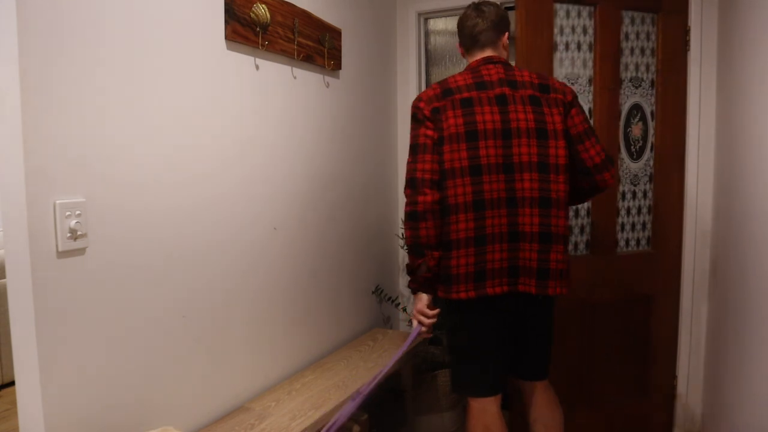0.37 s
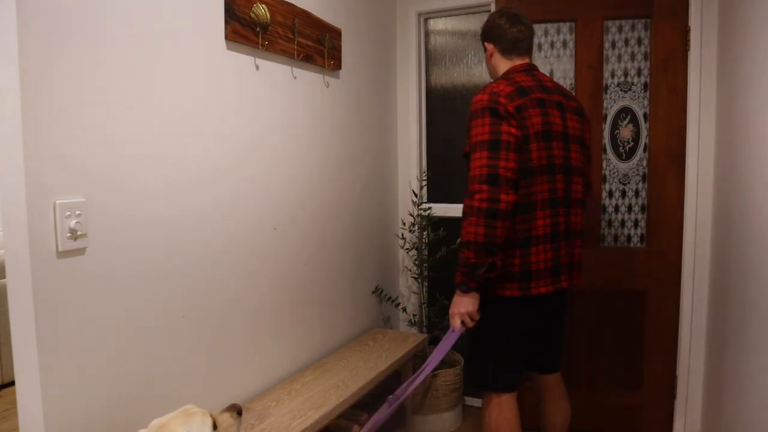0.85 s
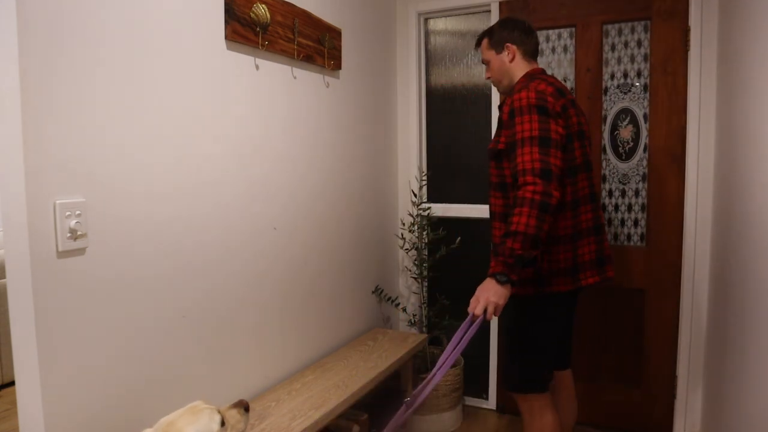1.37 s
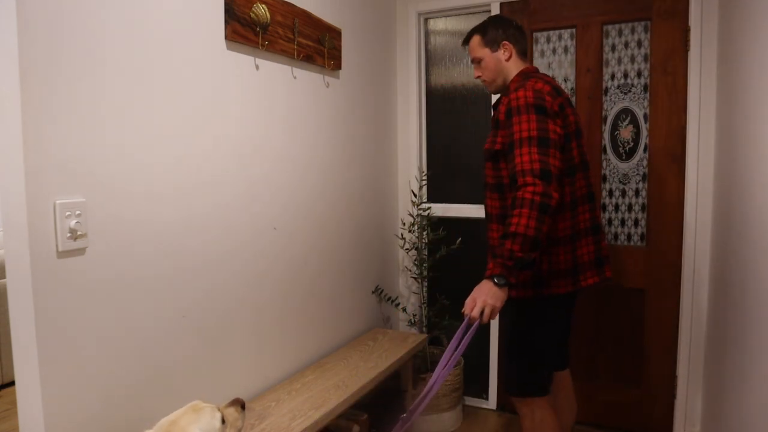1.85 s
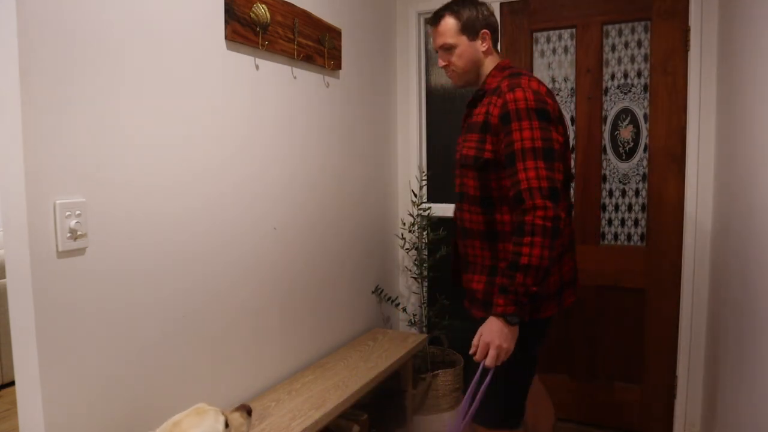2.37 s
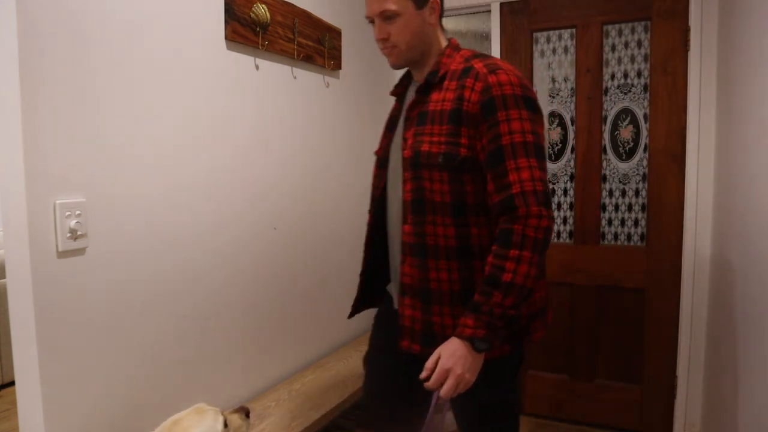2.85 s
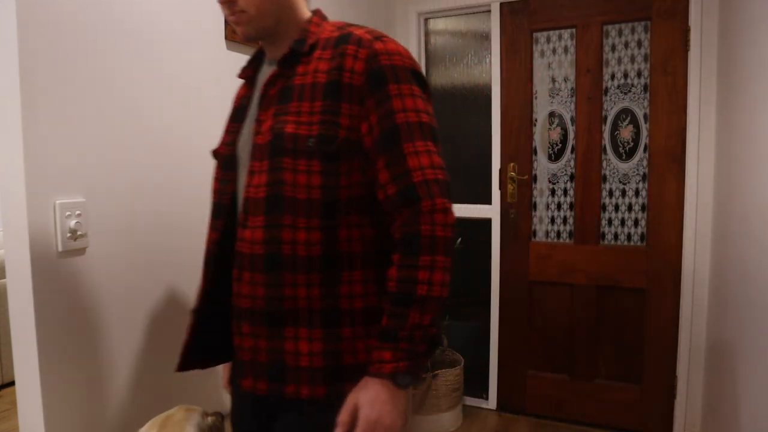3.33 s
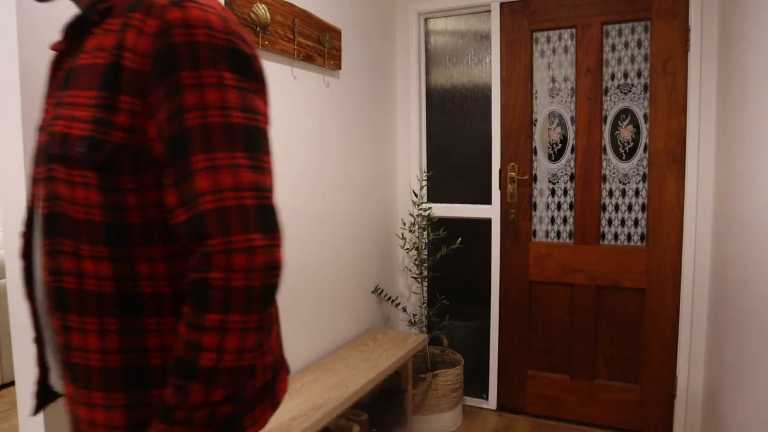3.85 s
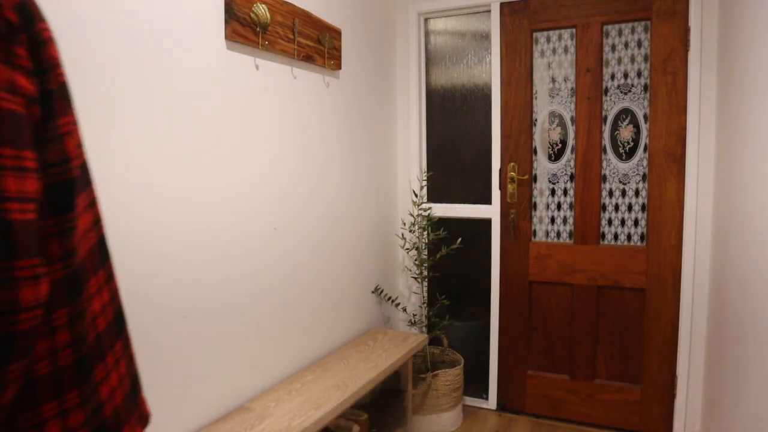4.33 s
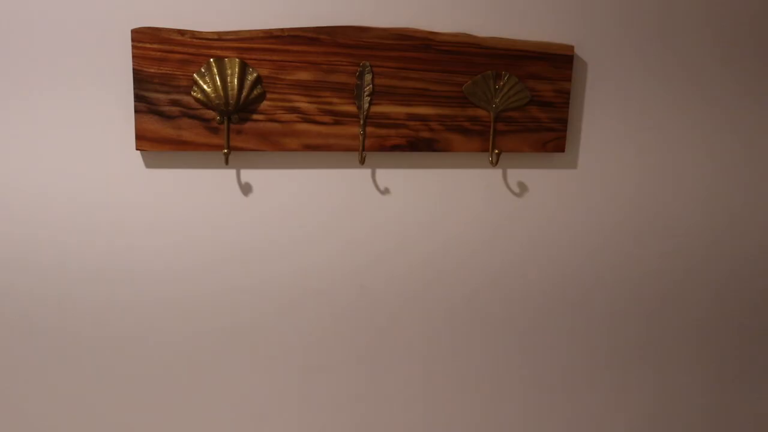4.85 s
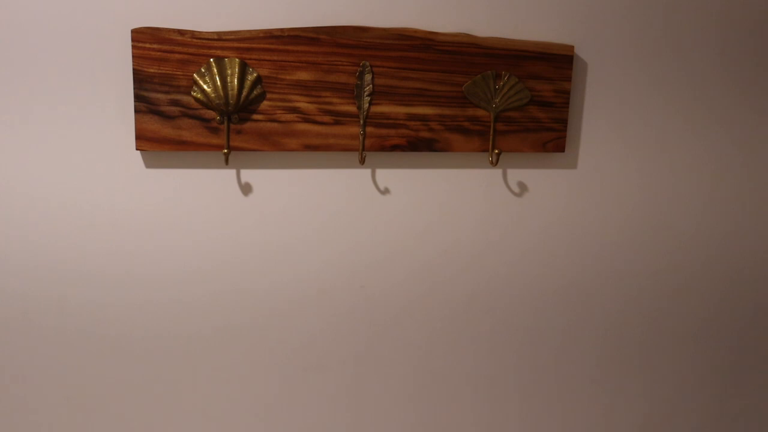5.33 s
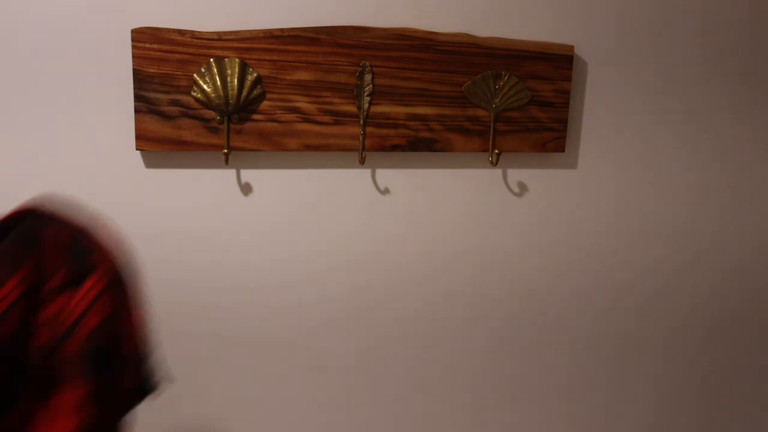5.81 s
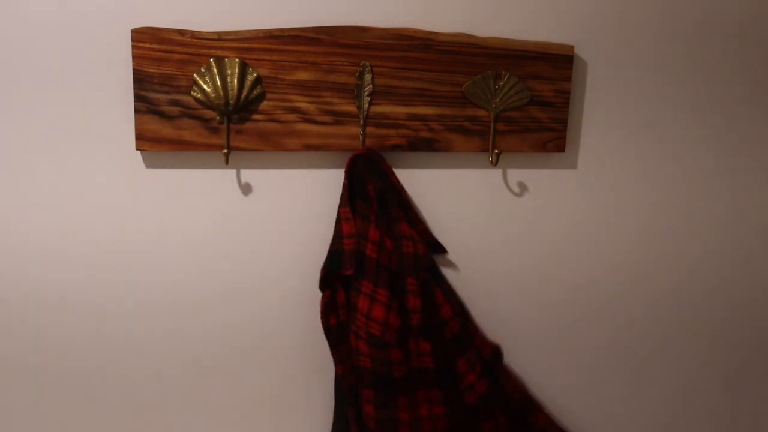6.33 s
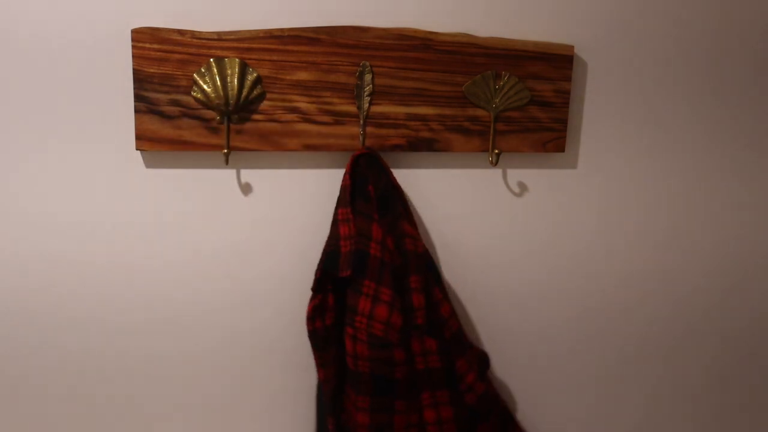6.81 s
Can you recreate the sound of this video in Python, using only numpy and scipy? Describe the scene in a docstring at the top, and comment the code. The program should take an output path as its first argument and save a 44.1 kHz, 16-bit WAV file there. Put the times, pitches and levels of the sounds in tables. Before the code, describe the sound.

In a small hard-walled hallway, clothes rustle while a dog's claws, lead and tags lightly tick and jingle. A latch clicks and a wooden door with glass panes bangs shut, rattling briefly. Feet scuff past, with sharp ticks and a hollow clatter close by. After an abrupt cut to a quieter spot, a shirt swishes onto a wall hook with a small wooden knock. Fixed indoor microphone, faint room hush.

```python
"""Dog and door in a hallway

A dog's paws, lead and tags tick and jingle; a wooden door with glass panes latches, bangs shut and rattles; feet
scuff past. After a cut, something whistles faintly and a shirt is hung on a wall hook. Contacts are noise bursts,
metal and hollow things are dying modes, cloth is grainy noise, the whistle a fuzzy gliding sine. A hard-walled
hall answers every hit, over low rumble and a steady hush."""
import sys
import numpy as np
from scipy import signal
from scipy.fft import rfft, irfft
from scipy.io import wavfile
from scipy.ndimage import map_coordinates

SR = 44100
rng = np.random.default_rng(int(sys.argv[2]) if len(sys.argv) > 2 else 0)


def boost(x):
    """Linear amplitude factor 10**(x/20) for a level x in decibels (scalar or array-like)."""
    u = np.asarray(x, float) / 20
    return 10 ** u


def inscribe(sig):
    """Save sig as 16-bit PCM at rate SR to the path in sys.argv[1].

    A 1-D sig is mono; a 2-D sig holds one channel per row.
    Samples are clipped to [-1, 1] before scaling.
    """
    pcm = np.round(np.clip(np.atleast_2d(sig).T, -1, 1) * 32767)
    wavfile.write(sys.argv[1], SR, pcm.astype(np.int16))


N = 306054  # length in samples
CUT_S = 4.727  # the first scene gives way to the second

# Low body of contacts and rubbing, relative spectrum: pitch_hz [Hz], level_db [dB]
BODY_COLOUR = [(100, -62), (200, -11), (400, 1.5), (800, 3), (2000, -3), (3000, -15.5), (5000, -64.5)]
# Bright edge of contacts and finest fibres, relative spectrum: pitch_hz [Hz], level_db [dB]
EDGE_COLOUR = [(2500, -58.5), (4500, -1.5), (7500, -2), (12000, -9), (15500, -19.5), (17000, -56.5)]
# Deepest part of the house rumble, relative spectrum: pitch_hz [Hz], level_db [dB]
DEEP_COLOUR = [(15, -59), (28, -7), (65, -6), (95, -3.5), (150, -62.5)]
# Floorboards, relative spectrum: pitch_hz [Hz], level_db [dB]
BOARDS_COLOUR = [(60, -120), (100, -0.5), (220, -2), (400, -6), (600, -120)]


def unit(x):
    """Scales a sound to rms 1."""
    return x / np.sqrt(np.mean(x ** 2) + 1e-20)


def along(points, hz):
    """Reads (Hz, value) points on a log frequency axis."""
    f, v = np.transpose(points)
    return np.interp(np.log(hz + 1), np.log(f + 1), v)


def curves(rows, **ends):
    """One value per sample for each column after the time."""
    s, *cols = np.transpose(rows)
    return [np.interp(np.arange(N) / SR, s, c, **ends) for c in cols]


def wander(points, size):
    """A smooth random curve through evenly spaced random points."""
    return map_coordinates(rng.standard_normal(points), [np.linspace(0, points - 1, size)])


def noise(gain, size, spiky_db=0):
    """Noise of rms 1 coloured by gain(Hz); spiky noise is made of uneven grains of 32 samples."""
    grain_db = spiky_db * rng.standard_normal(size // 32 + 1).repeat(32)[:size]
    grains = rng.standard_normal(size) * boost(grain_db)
    return unit(irfft(rfft(grains) * gain(np.fft.rfftfreq(size, 1 / SR)), size))


def shape(points):
    """Gain against frequency from a (Hz, dB) table."""
    return lambda hz: boost(along(points, hz))


def hump(centre_hz, octaves):
    """A broad resonance, steeper on its high side."""
    def gain(hz):
        distance = np.log2((hz + 1) / centre_hz) / octaves
        high_side = 1 + (hz / centre_hz / 3.0) ** 4
        return 1 / (1 + distance ** 2) ** 1.4 / high_side
    return gain


def ring(hz, t60, attack, waver):
    """A dying tone, one second long; its phase drifts a little."""
    t = np.arange(SR) / SR
    drift = waver * np.cumsum(rng.standard_normal(SR)) / np.sqrt(SR)
    return np.sin(2 * np.pi * hz * t + drift) * boost(-60 * t / t60) * (1 - np.exp(-t / attack))


def burst(length, attack):
    """Envelope of a short contact, half a second long; it falls 60 dB in its length."""
    t = np.arange(SR // 2) / SR
    return boost(-60 * t / length) * (1 - np.exp(-t / attack))


def swell(rise, fall):
    """Envelope with a smooth rise and a rounded fall, one second long."""
    t = np.arange(SR) / SR
    up = np.sin(np.pi / 2 * np.minimum(t / rise, 1)) ** 2
    return up * boost(-60 * (np.maximum(t - rise, 0) / fall) ** 2)


def hall(x, wet_db):
    """Adds a fresh tail: near walls answer fast and loud, then each frequency dies at its own speed."""
    # Late decay of the hall: pitch_hz [Hz], t60_s [s]
    decay = [(60, 0.38), (250, 0.95), (1000, 0.89), (3000, 0.66), (6000, 0.61), (11000, 0.37), (16000, 0.7)]
    hz, t, z = signal.stft(rng.standard_normal(SR), SR, nperseg=256)
    late = boost(-60 * t / along(decay, hz)[:, None])
    fade = late * (1 + 1.08 * boost(-60 * t / 0.17))
    fade *= boost(-2.5 * np.log2(1 + hz / 3000))[:, None]  # walls and coats soak up treble
    tail = signal.istft(z * fade, SR, nperseg=256)[1]
    tail = np.pad(tail, (150, 0)) / np.linalg.norm(tail)  # silent for 150 samples first
    x = x[:np.flatnonzero(np.abs(x) > boost(-130))[-1] + 1]  # drop the inaudible end
    wet = signal.fftconvolve(x, tail)
    return boost(wet_db) * wet + np.pad(x, (0, len(wet) - len(x)))


def add(track, s, x):
    """Lays x on the track at time s; the cut ends what started before it."""
    start = round(s * SR)
    stop = round(CUT_S * SR) if s < CUT_S else N
    track[start:stop][:len(x)] += x[:stop - start]


def rubbing():
    """Clothes and fur move: fibres slip in fine grains all the while."""
    # Loudness of the movement, one table per scene: time_s [s], hiss_db [dB], body_db [dB]
    scenes = [
        [(0.0, -55.5, -51), (0.2, -58.5, -55.5), (0.45, -68, -51), (0.7, -72, -58), (1.0, -61.5, -70),
         (1.5, -75, -65), (2.2, -65.5, -57), (2.66, -66, -60.5), (2.9, -59, -61.5), (3.3, -63, -64.5),
         (4.1, -63.5, -59.5), (4.36, -54, -49), (4.5, -54, -57), (4.72, -54, -56)],
        [(4.73, -63, -60.5), (5.0, -69, -67.5), (5.18, -71.5, -71.5), (5.33, -84.5, -88.5), (5.58, -64.5, -73),
         (5.9, -74, -90), (6.1, -92, -83), (6.23, -55, -53), (6.45, -51, -58), (6.7, -70, -74),
         (6.94, -68, -75.5)],
    ]
    # Hiss of the fibres, relative spectrum: pitch_hz [Hz], level_db [dB]
    hiss_colour = [(1180, -39), (2000, -4.5), (2640, -3), (3090, -5.5), (5610, -5), (6290, -12.5),
                   (9000, -9.5), (11700, -76.5), (19800, -120)]
    hiss_db, body_db = np.max([curves(rows, left=-120, right=-120) for rows in scenes], axis=0)
    fibres = noise(shape(hiss_colour), N, spiky_db=2.0)
    finest = boost(-6) * noise(shape(EDGE_COLOUR), N, spiky_db=2.5)
    low = noise(shape(BODY_COLOUR), N, spiky_db=1.0)
    return boost(hiss_db) * (fibres + finest) + boost(body_db) * low


def rumble():
    """Draught and steps: deep and floorboard noise bands slowly change level."""
    # Loudness of the two bands: time_s [s], deep_db [dB], boards_db [dB]
    levels = [(0.0, -56, -68.5), (0.4, -61, -61.5), (0.6, -62, -56.5), (1.1, -69, -61.5), (1.45, -72, -74),
              (2.7, -60.5, -76), (3.0, -69, -64), (3.7, -72.5, -71), (4.0, -69, -67.5), (4.7, -65.5, -69),
              (4.75, -77, -72), (5.4, -80, -74), (5.66, -83.5, -67.5), (6.1, -77, -73), (6.94, -77, -70.5)]
    deep_db, boards_db = curves(levels)
    return boost(deep_db) * noise(shape(DEEP_COLOUR), N) + boost(boards_db) * noise(shape(BOARDS_COLOUR), N)


def hush():
    """The still house: steady noise, slightly louder before the cut."""
    # Still house, relative spectrum: pitch_hz [Hz], level_db [dB]
    quiet_colour = [(100, -43), (200, -14), (400, -2), (1000, -5.5), (3000, -9.5), (6000, -12.5),
                    (10000, -14.5), (15000, -17.5), (16500, -29)]
    level_db = np.where(np.arange(N) < CUT_S * SR, -69, -70)
    return boost(level_db) * noise(shape(quiet_colour), N)


def strokes():
    """Soles, cloth and paws: a grainy swish swells smoothly and dies away."""
    # Single strokes: start_s [s], level_db [dB], centre_hz [Hz], rise_s [s], fall_s [s to -60 dB]
    stroke_rows = [(0.016, -48.5, 7000, 0.0064, 0.034), (0.337, -56, 6500, 0.007, 0.035),
                   (0.636, -58, 4300, 0.015, 0.14), (1.044, -42.5, 1417, 0.0028, 0.063),
                   (1.258, -52, 4000, 0.027, 0.2), (1.786, -31.5, 3000, 0.0088, 0.017),
                   (2.226, -56, 4000, 0.019, 0.091), (2.37, -41.5, 4800, 0.11, 0.22),
                   (2.40, -45, 1450, 0.028, 0.27), (2.89, -51.5, 2000, 0.022, 0.16),
                   (2.93, -56, 6100, 0.03, 0.27), (3.35, -68.5, 1300, 0.21, 0.27),
                   (3.545, -61, 7000, 0.023, 0.87), (3.64, -52, 2280, 0.017, 0.23),
                   (4.048, -55, 3000, 0.011, 0.14), (4.287, -41, 4840, .01, 0.088),
                   (4.34, -37.5, 4000, 0.028, 0.13), (4.662, -48, 4930, 0.023, 0.14),
                   (4.97, -63, 5000, .03, 0.058), (5.36, -66.5, 920, 0.26, 0.7),
                   (5.702, -65.5, 3980, 0.048, 0.29), (6.14, -64.5, 4000, .013, 0.16),
                   (6.22, -53, 6000, 0.0071, 0.11), (6.42, -41, 3910, 0.022, 0.23),
                   (6.65, -56, 3490, 0.017, 0.091)]
    out = np.zeros(N)
    for s, db, centre_hz, rise, fall in stroke_rows:
        swish = noise(hump(centre_hz, octaves=1.2), SR, spiky_db=0.5)
        swish += boost(-9.5) * noise(shape(EDGE_COLOUR), SR, spiky_db=5.5)  # finest fibres
        swish *= boost(1.7 * wander(50, SR))  # folds flutter
        add(out, s, hall(boost(db) * swish * swell(rise, fall), wet_db=-8))
    return out


def jingles():
    """Small loose metal parts ring in high modes, thin and chattering as the pieces touch."""
    # Metal parts touching: start_s [s], part [name], level_db [dB]
    jingle_rows = [(0.019, "clip", -39), (.235, "clip", -52), (0.748, "tag", -47.5), (1.064, "tag", -43.5),
                   (1.81, "latch", -37.5), (4.062, "buckle", -52.5), (4.404, "ring", -41),
                   (4.44, "ring", -47), (5.535, "button", -65.5), (6.155, "hook", -51)]
    # Modes of each named part: pitch_hz [Hz], level_db [dB, relative], t60_s [s]
    metal = {"tag": [(10100, -13, 0.24), (11800, -2.5, 0.197), (15250, -13, .2)],
             "clip": [(10600, -12, 0.42), (11190, -6, 0.23), (12300, -1, 0.21)],
             "ring": [(9650, -1.5, 0.48), (11160, 2, 0.33), (14370, -23, 0.13)], "latch": [(5870, 0, 0.51),
             (7950, -11.5, .5)], "buckle": [(8974, -4, .23)], "hook": [(3680, -2, 0.12)],
             "button": [(9650, 2.5, 0.35)]}
    out = np.zeros(N)
    for s, part, db in jingle_rows:
        tone = np.zeros(SR)
        for hz, level, t60 in metal[part]:
            chatter = boost(2.6 * wander(100, SR))
            tone += boost(level) * chatter * ring(hz, t60, attack=0.003, waver=17.0)
        add(out, s, hall(boost(db) * tone, wet_db=-10))
    return out


def ticks():
    """Hard points of contact, claws, metal clips and the rattling door: snaps that fall 60 dB in under 5 ms."""
    # Snaps: start_s [s], level_db [dB, before the envelope], centre_hz [Hz]
    tick_rows = [(0.0587, -31, 3830), (0.165, -30.5, 5200), (0.3624, -27, 5600), (0.8475, -37.5, 2760),
                 (0.865, -33.5, 3310), (0.904, -39, 5170), (0.46, -34, 6000), (1.068, -29.5, 6010),
                 (1.331, -28, 1750), (2.432, -26, 1620), (1.532, -22.5, 7000), (1.8363, -20, 5940),
                 (1.8706, -22.5, 4560), (1.898, -20, 3040), (1.926, -23, 4500), (3.098, -36, 4170),
                 (3.1868, -29, 2620), (3.3157, -30, 1800), (4.193, -20, 6700), (4.1976, -21, 4700),
                 (4.264, -19.5, 4670), (4.276, -17.5, 5240), (4.2806, -30, 4700), (4.6554, -22, 5570),
                 (4.6604, -27, 4900), (5.036, -30, 6120), (6.2705, -13, 3930), (6.3919, -21, 4580),
                 (6.7032, -36, 3370)]
    out = np.zeros(N)
    for s, db, centre_hz in tick_rows:
        snap = noise(hump(centre_hz, octaves=0.75), SR // 2) * burst(0.0046, attack=0.00029)
        add(out, s, hall(boost(db) * snap, wet_db=-3.5))
    return out


def taps():
    """Claws, latch, lead, buttons: a bright, sharp-edged scrape together with a burst with a hump and low body."""
    # Taps: start_s [s], level_db [dB, before the envelope], body_db [dB under or over the hump],
    # centre_hz [Hz], length_s [s]
    tap_rows = [(0.06, -25, -9, 4400, 0.043), (0.153, -41.5, -17, 1150, 0.067),
                (0.3615, -29, -10, 4900, 0.1), (0.626, -49.5, 4, 1970, 0.17),
                (0.7485, -34.5, -13, 1340, 0.064), (0.865, -25, -5, 3110, 0.035),
                (0.8897, -29, -23, 1313, 0.042), (1.051, -26, -0.5, 1856, 0.069),
                (1.5294, -24, -1.5, 3230, 0.075), (1.548, -29, -1, 1382, 0.069),
                (3.181, -39.5, -4.5, 2530, 0.21), (3.304, -36, -3, 1290, 0.16),
                (4.1937, -16, -6.5, 5600, 0.013), (4.2025, -18, -9.5, 4960, 0.047),
                (4.2572, -27, -8, 4700, 0.07), (4.274, -19.5, -27, 4710, 0.031),
                (4.432, -30, -15, 5000, 0.16), (4.6568, -29, -10, 4930, 0.081),
                (4.852, -58, 6.5, 1290, 0.06), (5.024, -38.5, -4.5, 5340, 0.067),
                (6.192, -42.5, 5.5, 1800, 0.085), (6.2667, -20.5, -7, 3790, 0.082),
                (6.3893, -15.5, -13, 3800, 0.039), (6.47, -28, -11.5, 3360, 0.05),
                (6.692, -45, -32, 3470, 0.057)]
    out = np.zeros(N)
    for s, db, body_db, centre_hz, length in tap_rows:
        contact = noise(hump(centre_hz, octaves=1.165), SR // 2)
        contact += boost(body_db) * noise(shape(BODY_COLOUR), SR // 2)
        contact *= burst(length, attack=0.094 * length)  # long contacts start more softly
        bright_scrape = boost(-16.5) * noise(shape(EDGE_COLOUR), SR // 2, spiky_db=8.5)
        bright_scrape *= burst(0.9 * length, attack=0.000423)
        add(out, s, hall(boost(db) * (contact + bright_scrape), wet_db=-4.0))
    return out


def knocks():
    """Hollow things such as floor, bench and wall board start softly and ring in low modes."""
    # Knocks: start_s [s], thing [name], level_db [dB]
    knock_rows = [(.363, "crate", -40.5), (.39, "bench", -51), (.49, "bench", -45), (.631, "board", -30),
                  (1.056, "stile", -37), (1.54, "floor", -45), (2.215, "floor", -33.5),
                  (2.49, "pane", -47.5), (4.19, "floor", -46), (4.29, "wall", -39.5),
                  (4.343, "bowl", -37.5), (4.372, "bowl", -34.5), (4.4, "bowl", -43), (4.75, "crate", -55),
                  (4.846, "board", -41), (5.029, "board", -36), (6.29, "rack", -41.5), (6.392, "rack", -31)]
    # Modes of each named thing: pitch_hz [Hz], level_db [dB, relative], t60_s [s]
    hollow = {"bench": [(235, 1.5, 0.31)], "board": [(586, 2.5, 0.025)], "crate": [(738, 13, 0.039)],
              "wall": [(38, -3.5, 0.36)], "stile": [(306, -3, .22), (1144, 0, 0.24)],
              "floor": [(92, -4, 0.13), (146, 1.5, 0.13), (205, -3, 0.3)], "pane": [(229, 3.5, 0.7)],
              "bowl": [(537, -6, 0.11), (614, -2, .15), (702, -0.5, 0.16), (856, -4.5, 0.12),
              (1580, -2, 0.093), (1930, -2, 0.082)], "rack": [(150, -6.5, 0.17), (212.4, -1.5, 0.26),
              (337, -10.5, 0.2)]}
    out = np.zeros(N)
    for s, thing, db in knock_rows:
        tone = sum(boost(level) * ring(hz, t60, attack=0.0034, waver=1.2) for hz, level, t60 in hollow[thing])
        add(out, s, hall(boost(db) * tone, wet_db=-12.5))
    return out


def thuds():
    """The house shudders under door, feet and rack: low noise swells and dies."""
    # Shudders: start_s [s], deep_db [dB], boards_db [dB], rise_s [s], fall_s [s to -60 dB]
    thud_rows = [(1.535, -57, -45.5, 0.015, 0.53), (1.901, -43.5, -41, 0.18, 0.31),
                 (2.298, -60, -57, 0.094, 0.68), (3.93, -75, -62, 0.031, 0.094),
                 (4.269, -62, -77, .06, 0.41), (6.15, -60.5, -51.5, 0.094, 0.4),
                 (6.36, -66, -46.5, 0.036, 0.28)]
    out = np.zeros(N)
    for s, deep_db, boards_db, rise, fall in thud_rows:
        deep = boost(deep_db) * noise(shape(DEEP_COLOUR), SR)
        boards = boost(boards_db) * noise(shape(BOARDS_COLOUR), SR)
        add(out, s, swell(rise, fall) * (deep + boards))
    return out


def door():
    """Door meets frame, then bounces: each blow cracks and rings the leaf's modes at new strengths."""
    # Blows: start_s [s], level_db [dB, whole blow], boom_db [dB, leaf only], length_s [s, crack]
    blows = [(1.7902, -22.5, 0, .01), (1.796, -11, -17.5, 0.038), (1.8014, -9, 1, 0.013),
             (1.8105, -17.5, 7.5, 0.031), (1.8208, -17, 6.5, 0.011), (1.8356, -18, 4.5, 0.025),
             (1.87, -21, 1.5, 0.074), (1.8844, -26.5, 8.5, 0.02), (1.8988, -21.5, -4, 0.05),
             (1.924, -17, -5.5, 0.028), (1.9326, -16.5, -4, 0.03), (1.964, -27.5, -0.5, 0.064),
             (1.977, -29.5, -1, 0.064), (2.043, -33.5, -17, 0.062), (2.104, -38, -7.5, 0.035)]
    # Modes of the door leaf: pitch_hz [Hz], level_db [dB, relative], t60_s [s]
    panel = [(62, -7, .35), (84, -3, .3), (129, 2, .3), (182, 0, .33), (240, -4, .3), (284, -9, .45),
             (370, -7, .4), (527, -13, .3), (580, -14, .33), (790, -16, .3), (1167, -17, .27),
             (1255, -18, .27), (1561, -18, .27), (1900, -20, .27)]
    # Wood on wood, relative spectrum before the treble tilt: pitch_hz [Hz], level_db [dB]
    crack_colour = [(18, -42.5), (30, -8), (138, -4), (584, -10.5), (760, -13), (1540, -11.5),
                    (2010, -17.5), (2540, -21.5), (3400, -23), (9220, -29), (16000, -46.5)]
    out = np.zeros(N)
    for s, db, boom_db, length in blows:
        leaf = np.zeros(SR)
        for hz, level, t60 in panel:
            leaf += boost(level + rng.normal(0, 1.3)) * ring(hz, t60, attack=0.005, waver=4.0)
        # treble tilt in dB per octave; later blows land duller
        tilt_db = 4.5 - 7 * (1 - np.exp(-(s - blows[0][0]) / 0.029))
        colour = lambda hz: shape(crack_colour)(hz) * boost(tilt_db * np.log2(1 + hz / 2000))
        crack = noise(colour, SR // 2, spiky_db=-1.5) * burst(length, attack=0.0022)
        blow = boost(boom_db - 12) * leaf + boost(5) * np.pad(crack, (0, SR - len(crack)))
        add(out, s, hall(boost(db) * blow, wet_db=-6.5))
    return out


def whistle():
    """A faint, fuzzy tone arcs up and back while its pitch and level flicker."""
    # Middle of the glide: time_s [s], pitch_hz [Hz], level_db [dB]
    glide = [(5.38, 9300, -91), (5.45, 11000, -78), (5.52, 12400, -74), (5.6, 13100, -74),
             (5.68, 12400, -71), (5.8, 12100, -76), (5.85, 12000, -98)]
    hz, db = curves(glide)
    t = np.arange(N) / SR
    on = (t > glide[0][0]) * (t < glide[-1][0])

    def flicker(rate):
        """Smooth random curve with rate points a second."""
        return map_coordinates(rng.standard_normal(int(N * rate / SR) + 4), [np.arange(N) * rate / SR])

    level = boost(db + 4.0 * flicker(60))
    pitch_hz = hz + 300.0 * flicker(45) + 450.0 * flicker(500)
    return on * level * np.sin(2 * np.pi * np.cumsum(pitch_hz) / SR)


def scene():
    """Sums all layers into one channel."""
    background = rubbing() + rumble() + hush()
    contacts = strokes() + jingles() + ticks() + taps() + knocks() + thuds() + door()
    return (background + contacts + whistle())[None]


def low_pass(x):
    """Removes everything above the highest recorded frequency."""
    return signal.sosfilt(signal.butter(12, 16510, fs=SR, output="sos"), x)


def record(dry):
    """Delivers the finished mix."""
    return low_pass(dry)


dry = scene()
out = record(dry)
inscribe(out)
```